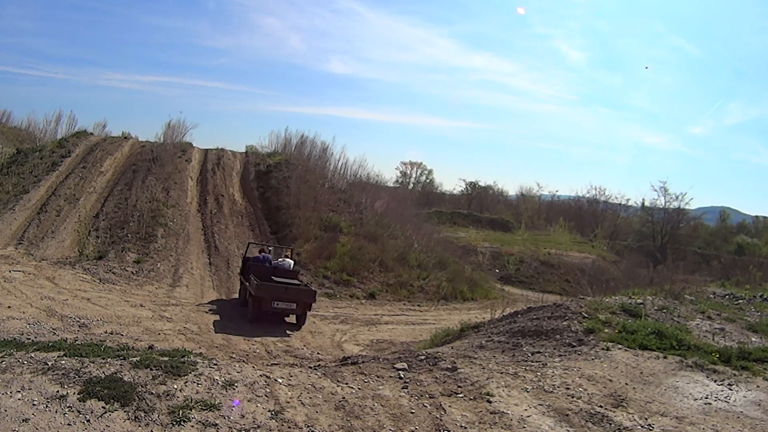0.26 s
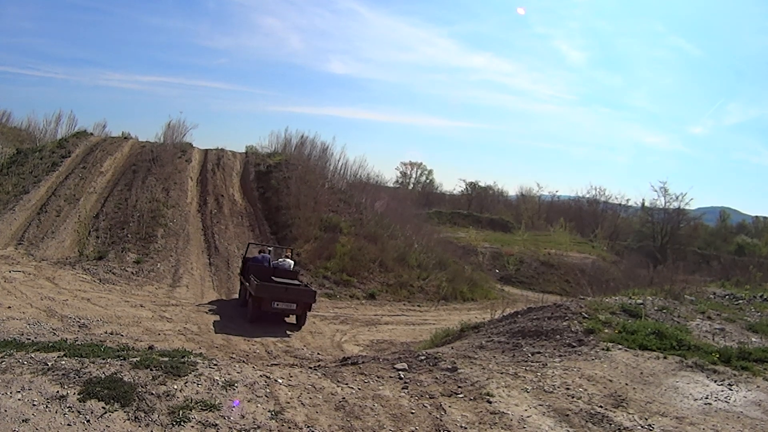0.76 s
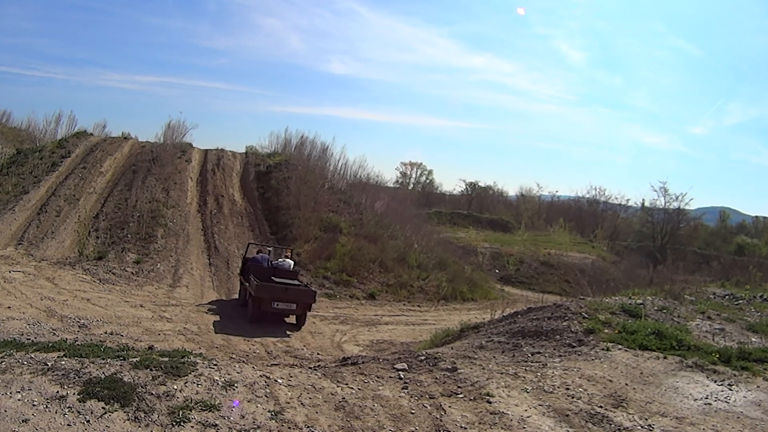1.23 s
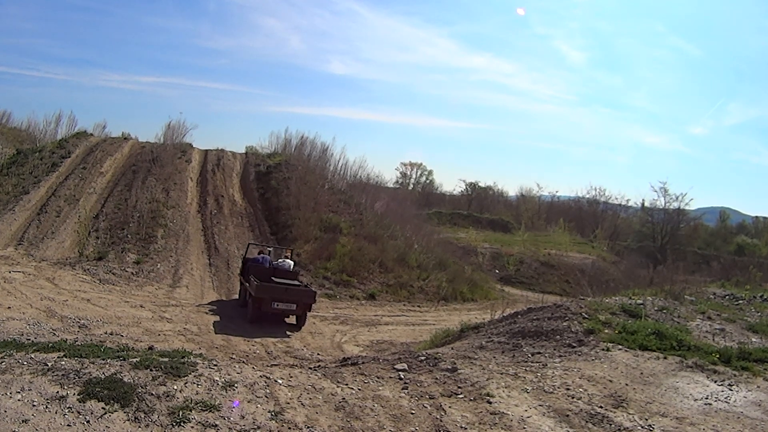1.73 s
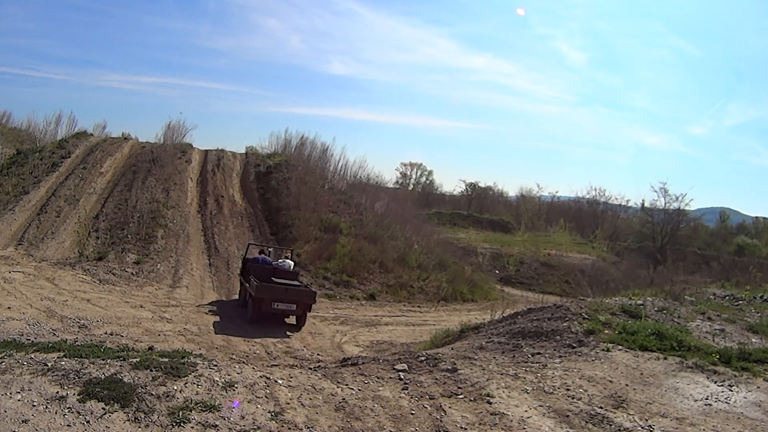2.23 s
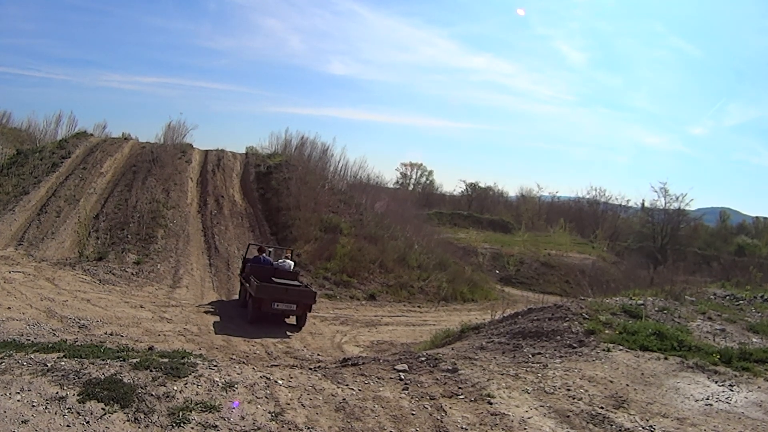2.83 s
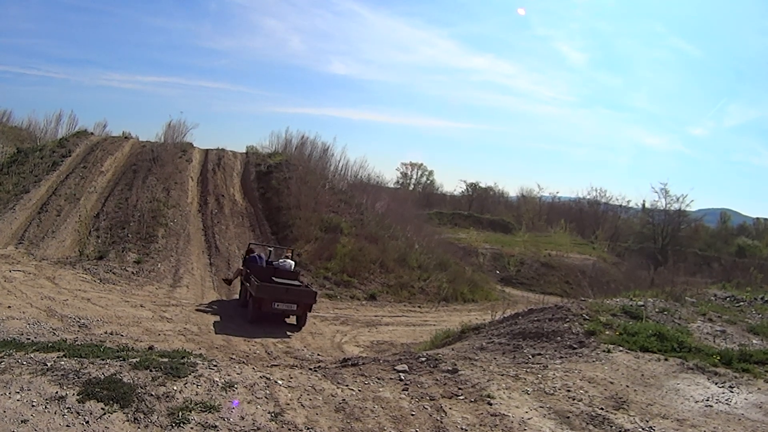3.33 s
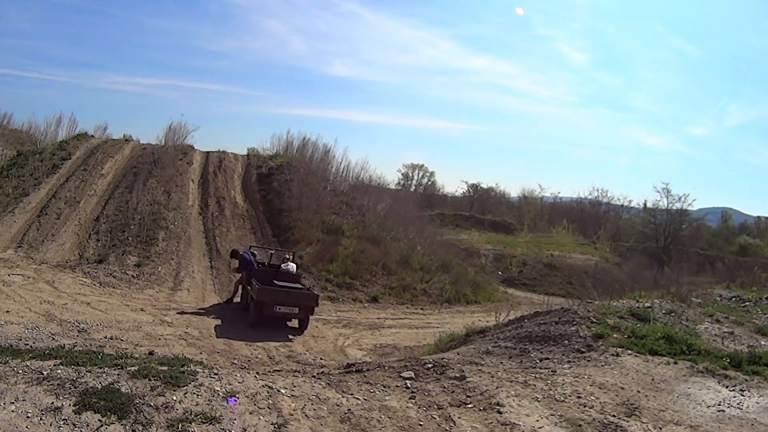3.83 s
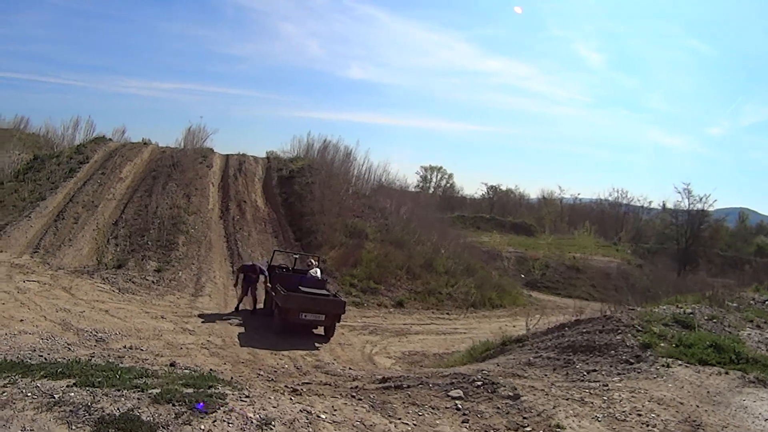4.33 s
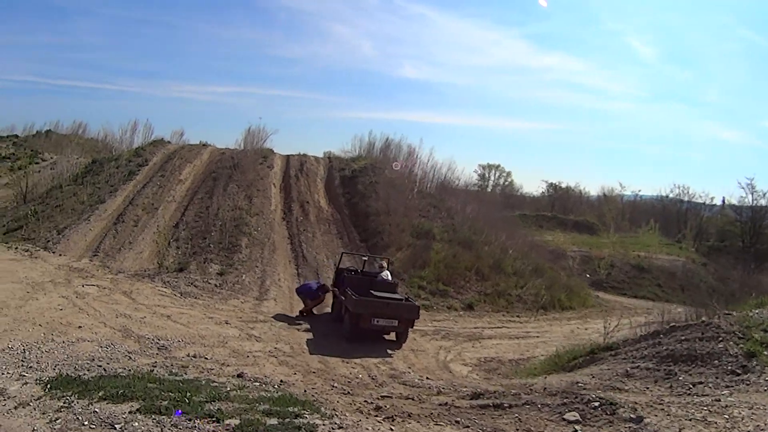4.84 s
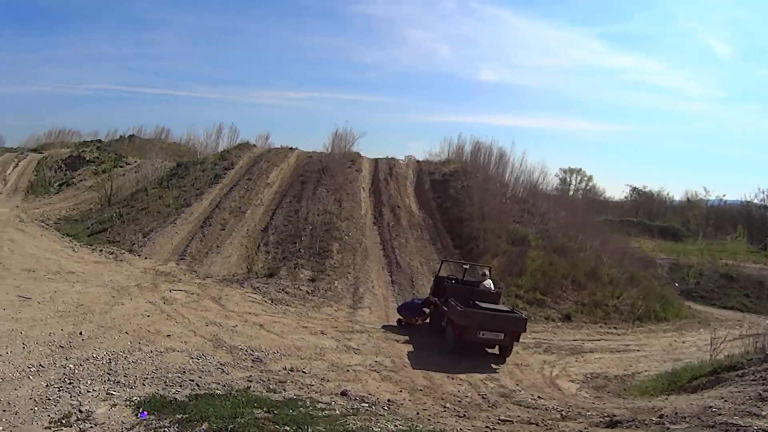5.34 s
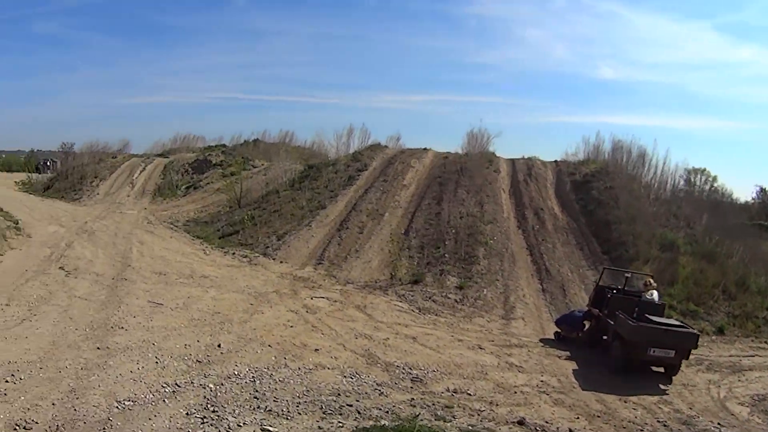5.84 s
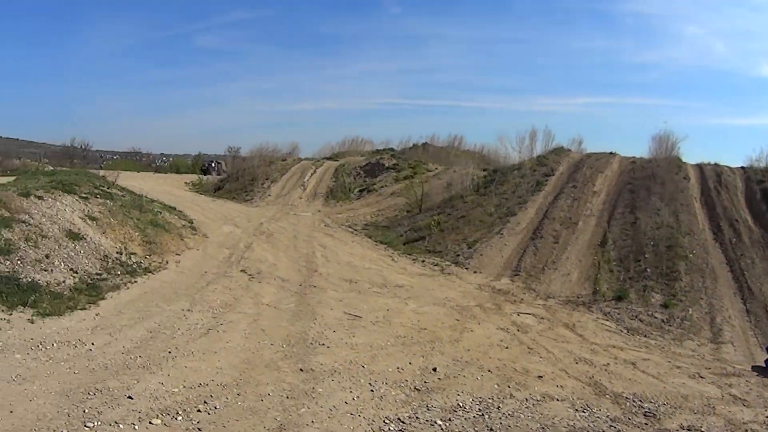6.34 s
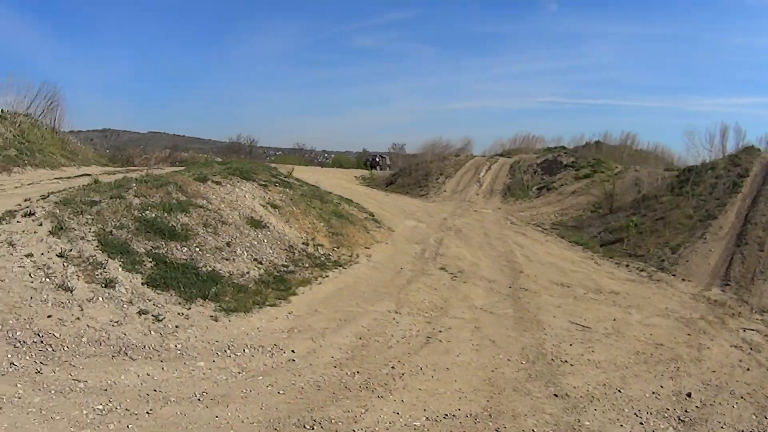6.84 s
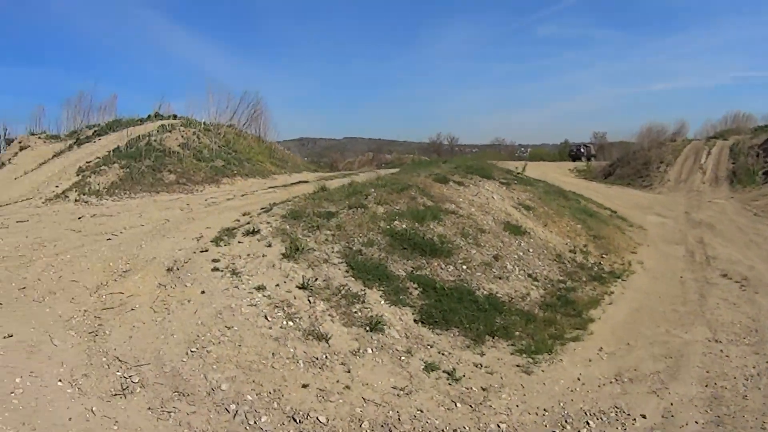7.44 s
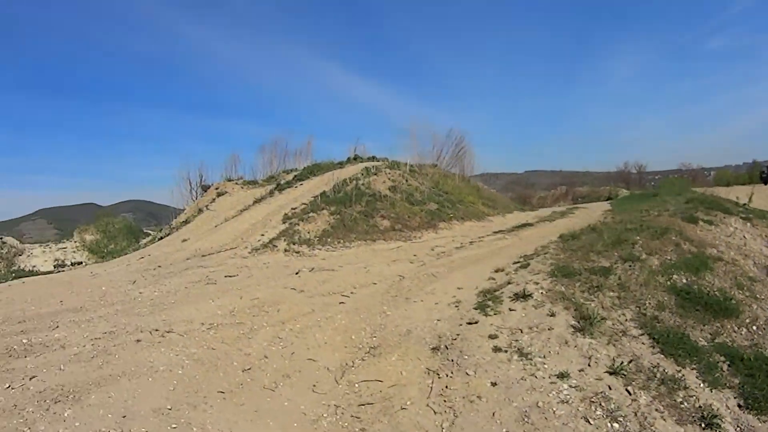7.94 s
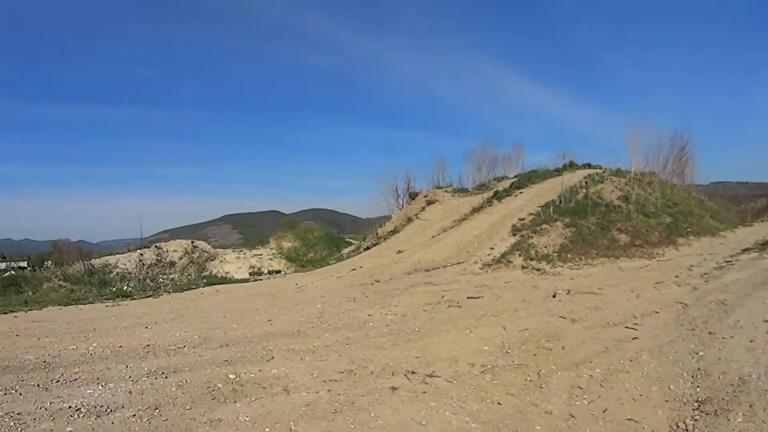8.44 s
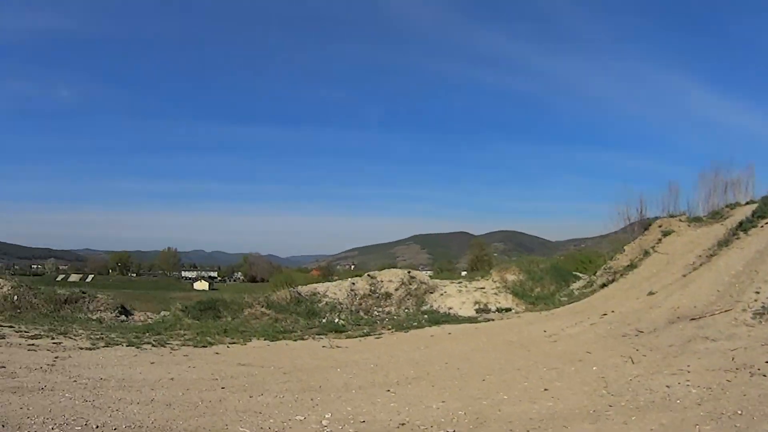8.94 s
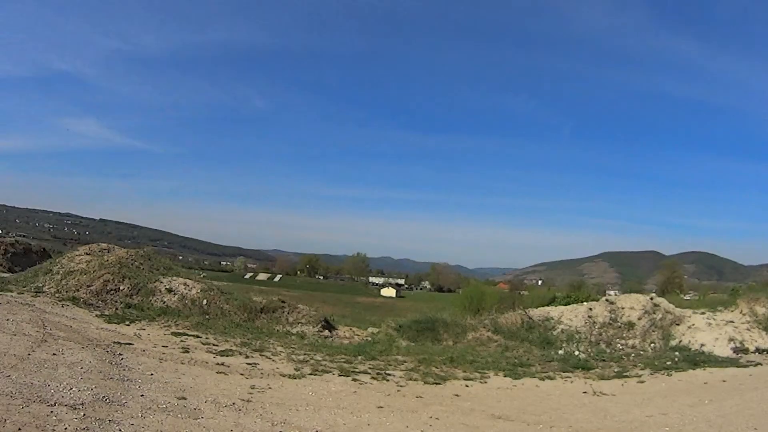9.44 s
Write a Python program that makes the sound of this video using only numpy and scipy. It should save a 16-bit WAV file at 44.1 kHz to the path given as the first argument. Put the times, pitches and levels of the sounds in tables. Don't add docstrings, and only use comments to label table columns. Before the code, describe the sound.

A small air-cooled two-cylinder engine idles outdoors, close and boomy through a camera clamped to the vehicle. A dry clutch hiss lasts until about 0.4 s, leaving a quiet, uneven low putter, faint preamp hiss and tiny high tappet ticks mostly on the left. Dull frame thuds land at 1.8, 2.2, 2.5 and 2.9 s. Around 3.1-3.7 s a lurch swells the rumble with a flurry of hard taps, then it settles, with light knocks from 4 to 4.8 s. At 5.1 s it pulls over rough dirt: deep shaking hum, a short creak near 5.4 s, faint strap rubbing. Knocks cluster at 6.4-6.6 s, with strong ones at 7.1-7.7 s. The rumble briefly dips near 7.9 s, then dense metallic clatter runs from 8.1 to 9.4 s, with heavy blows around 9.2 s and rapid dull knocking until the end, around 9.7 s.

```python
import sys
import numpy as np
from scipy import signal
from scipy.fft import rfft, irfft, next_fast_len
from scipy.io import wavfile
from scipy.ndimage import uniform_filter1d

SR = 44100
rng = np.random.default_rng(int(sys.argv[2]) if len(sys.argv) > 2 else 0)


def linear_from_db(decibels):
    return 10 ** (np.asarray(decibels, float) / 20)


def output_pcm(signal):
    pcm = np.clip(np.atleast_2d(signal).T, -1, 1) * 32767
    wavfile.write(sys.argv[1], SR, np.round(pcm).astype(np.int16))


N = 426888
SIZE = next_fast_len(N + SR // 4)
TIME = np.arange(N) / SR


def curves(table):
    s, *columns = np.transpose(table)
    return [np.interp(TIME, s, c) for c in columns]


def swells(table):
    slopes = [peak - 10 * np.abs(TIME - s) / max(slow, .02) for s, _, peak, slow in table]
    return curves(table)[0], np.max(slopes, axis=0)


def unit(x):
    return x / np.sqrt(np.mean(x ** 2))


def walk(rate):
    k = int(SR / rate)
    held = np.repeat(rng.standard_normal(N // k + 1), k)
    return unit(uniform_filter1d(uniform_filter1d(held, k), k)[:N])


def ports(lead, pan_db):
    return np.exp(np.array([[1], [-1]]) * .5j * lead) * linear_from_db(np.array([[pan_db], [-pan_db]]) / 2)


def responses(modes, order=2):
    f = np.fft.rfftfreq(SIZE, 1 / SR) + 1e-3
    h = [linear_from_db(db) * ports(lead, pan_db) / (1 + 1j * (f - hz ** 2 / f) / width) ** order
         for hz, width, db, pan_db, lead in modes]
    return np.array(h) / np.sqrt(np.mean(sum(abs(m.mean(axis=0)) ** 2 for m in h)))


def hum(hz, db, lead=-0.024, pan_db=1.5):
    turn = np.exp(2j * np.pi * np.cumsum(hz * (1 + 0.0128 * walk(12))) / SR)
    return np.sqrt(2) * linear_from_db(db + 2.8 * walk(12)) * (ports(lead, pan_db) * turn).real


# peak time in seconds, pitch in Hz, peak in dB, seconds per 10 dB of rise and fall.
FIRING_SWELLS = [(0.0, 59.98, -39, -0.7), (0.94, 58.6, -34, 7), (2.85, 59.41, -31.5, 7),
                 (3.04, 50.73, -27, -1), (3.18, 60.04, -19, 0.28), (3.3, 67.13, -23, -2.5),
                 (3.6, 62.6, -33, .08), (3.75, 58.01, -22.5, 0.24), (3.92, 52.44, -32, -0.5),
                 (4.29, 56.9, -30, .4), (5.0, 46.74, -26, -1.5), (5.23, 56.42, -16, 0.15),
                 (5.42, 63.44, -28, 0.1), (5.74, 63.95, -36, -1.5), (6.44, 54.24, -24, 0.24),
                 (6.85, 61.56, -29, 5.2), (7.2, 54.75, -34, -2.5), (8.05, 51.49, -28, -1),
                 (8.3, 56.2, -18.5, 0.3), (8.62, 65.87, -20.5, 0.1), (8.95, 66.23, -33, -3.5),
                 (9.25, 62.04, -23.5, 1.5), (9.55, 63.9, -22, 0)]


def firing_hum():
    second_hz, db = swells(FIRING_SWELLS)
    return hum(second_hz, db), second_hz


def firings(second_hz):
    turns = np.cumsum(second_hz / 2 * (1 + .03 * walk(25))) / SR
    at = np.flatnonzero(np.diff(np.floor(turns)))
    pulses = np.zeros(N)
    pulses[at] = linear_from_db(-3 * (np.arange(len(at)) % 2))
    return unit(pulses), turns % 1


# time in seconds, road roughness in dB over idle, throttle in dB over idle.
DRIVING = [(0.0, 2.5, 1.5), (0.25, 1, 5), (0.55, 1, 1), (1.9, 1, 1.5), (3.0, 2, 1.5), (3.12, 13, 1),
           (3.28, 15.5, 2.5), (3.42, 5.5, 1.5), (3.8, 3, 1), (5.0, 5, 2), (5.12, 14, 3.5), (6.62, 12, 2.5),
           (7.3, 12.5, 4), (7.65, 10, 5.5), (8.3, 12.5, 4.5), (8.8, 12.5, 1), (9.4, 13.5, 5.5),
           (9.68, 10.5, 6.5)]
# centre in seconds, change in dB, half length in seconds.
SPRINGS = [(1.2, 4.5, 0.097), (2.16, 6, 0.23), (2.51, 4.5, 0.05), (3.123, 7.5, 0.11), (3.99, 2.5, 0.12),
           (5.12, 3, 0.045), (5.509, 0, .08), (5.616, -5.5, 0.049), (6.17, 1.5, .12), (6.772, -10.5, 0.076),
           (6.905, 7.5, 0.064), (7.143, 7, 0.026), (7.22, -3.5, 0.077), (7.4, 7, 0.054), (7.504, -2, 0.051),
           (7.665, 7, 0.096), (7.934, -11.5, 0.12), (8.14, 6.5, 0.089), (8.446, 8.5, 0.23),
           (8.74, -1.5, .07), (8.968, 3, 0.052), (9.453, -5.5, 0.027), (9.57, 4.5, 0.052)]
# idle level in dB, then dB per dB of road, of throttle and of spring.
FOLLOW = [
    (-26.5, 0.6969, -0.13, 0.52),
    (-41.5, 1.0841, 0.13, 0.32),
    (-47.5, 0.4767, 0.73, 0.13),
    (-54, -0.04, 1.48, 0.05),
]


def shaking():
    road, throttle = curves(DRIVING)
    spring = sum(db * np.exp(-((TIME - s) / half) ** 2) for s, db, half in SPRINGS)
    return [idle + a * road + b * throttle + c * spring for idle, a, b, c in FOLLOW]


# start in seconds, frame peak in dB, housing in dB, mount in dB, chatter in seconds.
BUMPS = [(1.8256, -14, -37.5, -25, 0.022), (2.1912, -18.5, -51, -33, 0.013), (2.505, -20, -22, -24, .012),
         (2.856, -22.5, -39, -25.5, 0.021), (2.889, -22, -39, -26, 0.018), (3.012, -31, -45, -32, 0.018),
         (3.051, -29, -40, -32, 0.02), (3.15, -21.5, -34, -23, 0.015), (1.905, -29, -46, -41, 0.012),
         (7.125, -28, -25, -9.5, 0.023), (7.149, -22.5, -21, -20, 0.021), (8.458, -11.5, -16, -25, 0.0038),
         (8.9857, -22, -13.5, -24, 0.0034), (9.1926, -6.5, -19, -16, .003), (9.2897, -13, -29, -15, 0.0027)]
# start in seconds, housing peak in dB, mount in dB, tin in dB.
KNOCKS = [(2.442, -53, -29, -57), (3.319, -25, -26, -50), (4.065, -39, -26, -56), (4.272, -36, -23, -56),
          (4.49, -47, -23, -58), (4.788, -38, -28, -56), (6.354, -22.5, -16, -53), (6.4637, -31, -14, -61),
          (6.573, -29, -18, -43), (6.6049, -21, -13.5, -47), (7.008, -38, -17, -56),
          (7.2993, -27, -16, -54), (7.344, -13.5, -2, -63), (7.556, -20, -6.5, -60.5),
          (7.6924, -16, -14, -45), (8.614, -26, -15, -40), (9.4642, -18.5, -8, -52),
          (9.486, -22, -7.5, -51), (9.5212, -28, -20, -46), (9.5426, -39, -9, -43),
          (9.5723, -32, -8.5, -48), (9.5972, -28, -9.5, -43), (9.626, -16.5, -15, -47),
          (9.654, -37, -8.5, -50)]
# start in seconds, housing peak in dB, mount in dB, tin in dB.
TAPS = [(3.312, -27, -28, -42), (3.332, -34, -39, -33), (3.346, -19, -38, -32), (3.376, -25, -30, -35),
        (3.383, -18, -26, -31), (3.405, -28, -32, -33), (3.422, -27, -43, -38.5), (3.635, -26, -44, -39),
        (3.666, -24, -46, -38), (3.702, -22, -52, -38), (5.7317, -18, -30, -27), (6.9587, -22.5, -10, -32),
        (7.701, -15, -27, -21), (7.7306, -13.5, -22, -31), (7.749, -23, -14, -51), (7.9148, -20, -38, -37),
        (8.1226, -15, -28, -29), (8.1826, -22, -18, -36), (8.208, -17, -8.5, -37), (8.227, -18, -10, -30),
        (8.2824, -16, -12, -31), (8.2637, -11.5, -23, -25), (8.298, -10, -11, -29), (8.336, -26, -24, -34),
        (8.381, -20, -25, -32), (8.3572, -18, -13, -33), (8.395, -14, -7, -31.5)]
# start in seconds, housing peak in dB, mount in dB, tin in dB.
RATTLES = [(8.4865, -12, -15.5, -31), (8.5, -24, -35, -34), (8.5188, -10, -19, -26), (8.533, -26, -32, -32),
           (8.549, -23, -32, -31), (8.586, -21, -30, -33), (8.651, -20, -9, -28), (8.6784, -21, -14, -33),
           (8.7102, -7, -14, -27.5), (8.744, -8.5, -11, -33), (8.774, -11.5, -8, -32),
           (8.8035, -12, -10, -31), (8.8387, -10, -13, -38), (8.9018, -17.5, -18, -34),
           (8.9239, -19, -39, -39), (8.962, -25, -32, -33), (9.0848, -24, -30, -31),
           (9.119, -7.5, -10, -28), (9.1524, -14.5, -19, -35), (9.1802, -21, -12.5, -29),
           (9.3219, -28, -26, -32), (9.3529, -37, -10, -40), (9.4335, -15, -18, -31),
           (8.038, -27, -31, -42), (8.0592, -26, -30, -40), (8.1094, -21, -28, -40), (8.134, -26, -30, -40),
           (8.197, -22, -28, -42), (8.315, -25, -28, -40), (8.4637, -22, -27, -36), (8.628, -24, -18, -40),
           (9.0559, -30, -35, -42), (9.1049, -20, -30, -41), (9.2762, -26, -26, -40),
           (9.3098, -28, -28, -40), (9.3707, -31, -33, -42), (9.3996, -31, -24, -42)]


def hits():
    knocks = [(s, mount - 8, mount, housing, tin, 0.01) for s, housing, mount, tin in KNOCKS]
    taps = [(s, -17, mount, housing, tin, 0.003) for s, housing, mount, tin in TAPS]
    rattles = [(s, -23, mount, housing, tin, 0.0026) for s, housing, mount, tin in RATTLES]
    bumps = [(s, frame, mount, housing, housing - 38, length)
             for s, frame, housing, mount, length in BUMPS]
    return knocks + taps + rattles + bumps


KNOCK_HZ = (400, 850, 1750, 2100)


def blows(hz, build_s, strike, struck, chance):
    out, t = np.zeros(N + SR), np.arange(chance.shape[1]) / SR
    push = np.hanning(int(SR / hz) + 3)
    push = 2 * push / push.sum()
    for (s, *levels, length), noise in zip(struck, chance):
        gain = linear_from_db(np.interp(np.log(hz), np.log(KNOCK_HZ), levels))
        i = int((s - build_s) * SR)
        sharp = np.exp(-length / 0.0097)
        fade = max(length, 5e-4) * (KNOCK_HZ[1] / hz) ** 0.27
        k = min(int(6 * fade * SR), len(t))
        envelope = np.exp(-t[:k] / fade) * (1 - np.exp(-t[:k] / (0.072 * fade)))
        out[i:i + k] += gain * 1.11 * noise[:k] * envelope * (1 - sharp)
        out[i:i + len(push)] += gain * strike * sharp * push
    return out[:N] * linear_from_db(-6.5 * max(np.log2(hz / 3530), 0))


# pitch in Hz, width in Hz, level in dB, left minus right in dB, left's lead in radians.
CHASSIS = [(38, 42, -9, 1, -.3), (62, 27, -13, 1.5, -1.2), (96.4, 19, -1, -1.5, -0.14),
           (120.9, 31.7, 0, 1.2, 0.67), (198, 70, -8, -0.5, -0.7), (210, 58, -9.5, -2.5, -3)]
MOUNT = [(298.8, 90, -1, -11, 3.5), (476, 130, 2.5, 1.1, -2.5), (571.4, 52, -3.5, -5.5, -2),
         (650, 91, -4.5, -3, -0.97), (643, 235, -9, 5, -3), (836.5, 134, -12.5, -2.5, 0),
         (901.6, 100, -10, 5, -1.75), (1260, 332, -22.5, -6.5, -1.45)]
HOUSING = [(1369, 134, -9.5, .1, 0.4), (1607, 315, 6, .1, .15), (1833, 150, -1, .1, 1.7),
           (2726, 418, -11.5, 7.7, 1.806)]
TIN = [(2030, 550, -0.5, .1, 0.45), (2390, 310, -0.5, 0.99, 3.43), (2950, 950, 1.5, .1, 1.68),
       (3443, 130, -5.5, .1, 1.3), (4280, 3500, -10, .1, 4.37), (5120, 1250, -7.5, .1, 0.35),
       (5950, 260, -11, 2.1, 1), (7500, 2600, -19.5, .1, 1.1)]
# share of firing pulses 0-1,
# gating by the cycle 0-1, flicker in dB, knock trim in dB, how evenly knocks reach weak modes 0-1.
DRIVE = [
    (0.27, 0, 1.13, -7, 0),
    (0.08, 0.04, 1.28, 3, 0.3),
    (0.01, 0.12, 1.24, 4, 0.57),
    (0, 0.17, 0.66, 7, 0.1),
]
STEEP = (2, 2, 3, 2)


def vehicle(second_hz):
    pulses, phase = firings(second_hz)
    puff = np.exp(-phase / 0.36)
    puff = puff / puff.mean() - 1
    jolt, out = walk(16), 0
    struck = hits()
    chance = rng.standard_normal((len(struck), SR // 10))
    parts = zip((CHASSIS, MOUNT, HOUSING, TIN), shaking(), DRIVE, STEEP)
    for modes, db, (share, gate, flicker_db, trim_db, even), steep in parts:
        h = responses(modes, order=steep)
        strike = 1 / np.abs(irfft(h.sum(axis=0).mean(axis=0), SIZE)).max()
        fired = np.sqrt(share) * pulses * linear_from_db(db)
        swell = np.sqrt(1 - share) * (1 + gate * puff) * linear_from_db(db + flicker_db * (jolt + walk(30)))
        for (hz, width, mode_db, *_), response in zip(modes, h):
            buzz = swell * linear_from_db(0.7 * walk(5)) * rng.standard_normal(N)
            build_s = min(0.4 / width, .003)
            knocks = blows(hz, build_s, strike, struck, chance)
            knocks = knocks * linear_from_db(trim_db + even * min(-mode_db, 11))
            out = out + response * rfft(fired + buzz + knocks, SIZE)
    return irfft(out, SIZE)[:, :N]


# peak time in seconds, pitch in Hz, peak in dB, seconds per 10 dB of rise and fall.
ROCK = [(0.05, 44.6, -33, .15), (1.4, 43.1, -40, 2.5), (3.1, 31.84, -34, .15), (3.58, 35.52, -24, 0.19),
        (4.0, 34.4, -25.5, 0.4), (4.47, 37, -24, 0.13), (5.1, 33, -26, .3), (5.5, 31.79, -16, 0.14),
        (5.85, 37.67, -16.5, 0.1), (6.6, 32.87, -23, .3), (7.23, 30.85, -18.5, 0.32),
        (7.49, 29.84, -22.5, 0.36), (8.27, 31.81, -17, 0.36), (8.7, 31.94, -21, 0.3),
        (9.35, 30.18, -26.5, 0.43), (9.68, 40.3, -22, .25)]


def engine_rock():
    return hum(*swells(ROCK), lead=-0.75)


# peak time in seconds, pitch in Hz, peak in dB, seconds per 10 dB of rise and fall.
PAN = [(0.0, 86.4, -36, 1.2), (1.15, 93, -50, 0.2), (1.5, 88, -34.5, 0.96), (2.9, 88.65, -27.5, 0.8),
       (3.3, 102.7, -17.5, 0.23), (3.99, 98.9, -18.5, 0.061), (4.7, 98, -33, 0.57), (5.12, 102, -28, .15),
       (5.48, 99.2, -19.5, 0.2), (5.74, 80, -36, .12), (6.25, 96.5, -34, .3), (6.79, 100, -25.5, 0.29),
       (7.57, 96.9, -35, 0.29), (8.19, 100.6, -21.5, 0.53), (9.0, 96.3, -16.5, 0.22),
       (9.68, 109.3, -33, .2)]


def floor_pan():
    return hum(*swells(PAN), lead=-0.73, pan_db=0.5)


# pitch in Hz, width in Hz, level in dB, left minus right in dB, left's lead in radians.
CLUTCH = [(1626, 183, 13, .1, 0.28), (2130, 410, 0, 0.09, 0.72), (3140, 550, -1, .1, 0.93),
          (5250, 550, -15, .1, 0.4)]


def clutch():
    end_s, fade_s = 0.44, 0.04
    slip = linear_from_db(-36.5 + walk(26)) / (1 + np.exp(np.minimum((TIME - end_s) / fade_s, 50)))
    rung = sum(h * rfft(slip * rng.standard_normal(N), SIZE) for h in responses(CLUTCH))
    return irfft(rung, SIZE)[:, :N]


# start in seconds, peak in dB.
TICKS = [(0.103, -55.5), (0.1535, -58), (0.3087, -52), (0.36, -52), (0.5107, -55), (0.7183, -55),
         (1.0415, -53), (1.1498, -57), (1.2555, -56), (1.3619, -56), (1.6776, -59), (1.836, -63),
         (1.9979, -59), (2.2653, -54), (3.247, -54), (3.4191, -59), (3.5867, -60), (3.643, -59),
         (3.697, -59), (3.7524, -60), (3.8064, -60), (3.9695, -60), (5.51, -54), (5.5652, -57),
         (5.6208, -56), (5.9506, -56), (6.0656, -53), (6.1204, -58), (6.2853, -52), (0.2588, -63),
         (1.5194, -62), (1.73, -60), (2.1081, -61), (2.1585, -60), (2.4269, -58), (2.9158, -59),
         (3.1353, -59), (4.1904, -63), (4.6299, -60), (4.6857, -59), (4.7411, -59), (5.2805, -59),
         (5.3428, -58), (6.1749, -58), (6.6034, -58), (7.1164, -57), (7.492, -57), (7.5648, -56),
         (7.8303, -54), (8.1449, -57)]


def tappet():
    hz, t60_s, rise_s = 6040, 0.036, 0.0021
    out, t = np.zeros(N + SR), np.arange(SR // 16) / SR
    ring = np.sin(2 * np.pi * hz * t) * np.exp(-np.log(1000) * t / t60_s)
    ring = ring * (1 - np.exp(-t / rise_s))
    for s, db in TICKS:
        i = int(s * SR)
        out[i:i + len(t)] += linear_from_db(db) * ring / ring.max()
    return out[:N] * ports(0, 19.5).real


# centre in seconds, pitch in Hz, width in Hz, level in dB, half length in seconds.
RUBS = [(5.72, 5100, 250, -60, .33), (7.15, 5100, 300, -58, .28), (7.72, 5700, 700, -57, .3),
        (7.35, 4600, 300, -61, .2), (7.4, 7400, 700, -64, .4), (6.42, 7700, 700, -60, .012),
        (9.61, 8000, 1500, -56, .022), (6.15, 5800, 400, -62, .25), (8.9, 2700, 450, -50, .75),
        (8.9, 126, 25, -23, .15), (4.4, 118, 22, -29, .1), (3.2, 1250, 500, -43, .18),
        (5.6, 1300, 700, -45, .5), (6.6, 560, 200, -33, .12), (1.23, 1200, 300, -48, .09),
        (5.37, 860, 50, -27, .018), (5.505, 1870, 40, -39, .028)]


def strap():
    out = 0
    for s, hz, width, db, half in RUBS:
        envelope = linear_from_db(db + 1.1 * walk(40)) * np.exp(-((TIME - s) / half) ** 4)
        rub = envelope * rng.standard_normal(N)
        out = out + responses([(hz, width, 0, 0, .4)])[0] * rfft(rub, SIZE)
    return irfft(out, SIZE)[:, :N]


def scene():
    firing_tone, second_hz = firing_hum()
    tones = firing_tone + engine_rock() + floor_pan()
    return vehicle(second_hz) + tones + clutch() + tappet() + strap()


def roll_off(x):
    return signal.sosfilt(signal.butter(12, 11320, fs=SR, output="sos"), x)


def record(dry):
    hiss_db, hiss_hz, likeness = -58, 4970, 0.65
    highpass = signal.butter(1, hiss_hz, "high", fs=SR)
    mid, side = signal.lfilter(*highpass, rng.standard_normal((2, N)))
    hiss = np.sqrt(1 + likeness) * mid + np.sqrt(1 - likeness) * side * np.array([[1], [-1]])
    sharpness = np.abs(np.gradient(dry, axis=1)).max(axis=0)
    loud = uniform_filter1d(sharpness, size=SR // 7)
    duck = np.minimum(1, 0.011 / loud) ** 2.4
    rounded = np.tanh(0.77 * (dry + linear_from_db(hiss_db) * duck * hiss)) / 0.89
    lowpass = signal.ellip(12, .3, 70, 11000, fs=SR, output="sos")
    return roll_off(signal.sosfilt(lowpass, rounded))


dry = scene()
out = record(dry)
output_pcm(out)
```